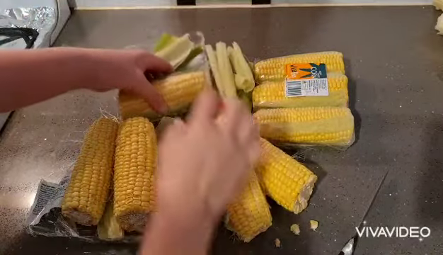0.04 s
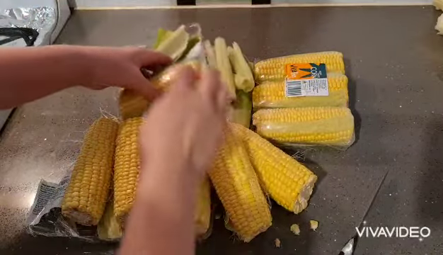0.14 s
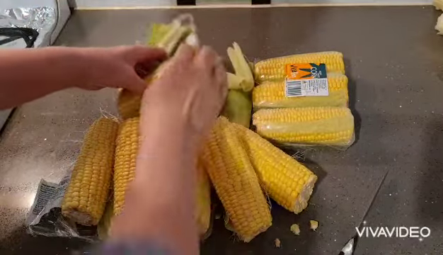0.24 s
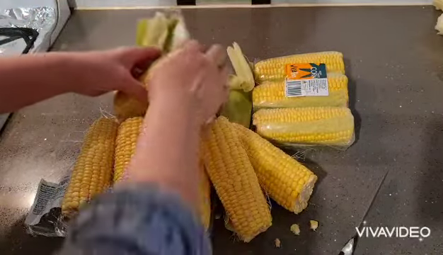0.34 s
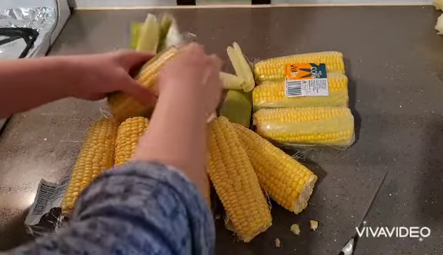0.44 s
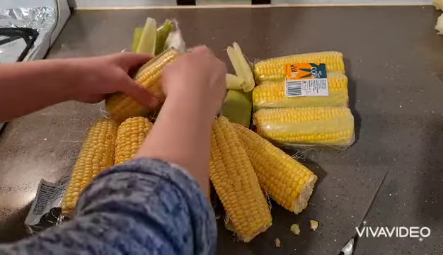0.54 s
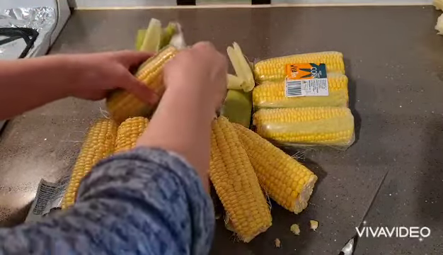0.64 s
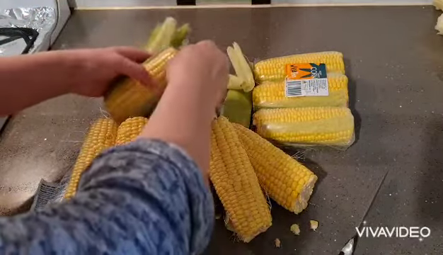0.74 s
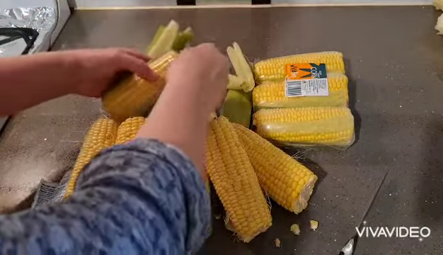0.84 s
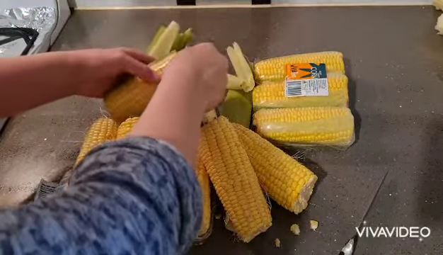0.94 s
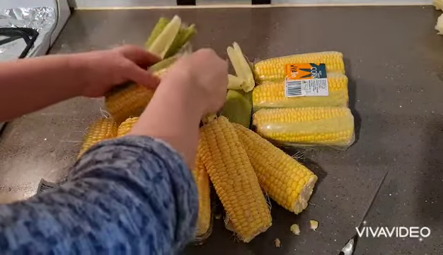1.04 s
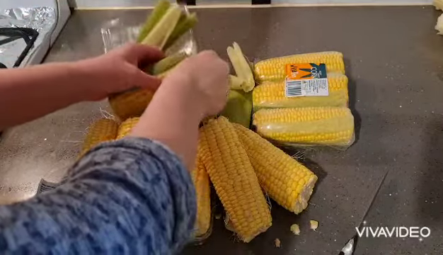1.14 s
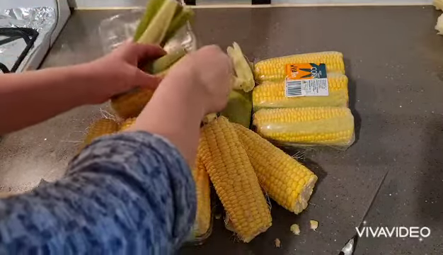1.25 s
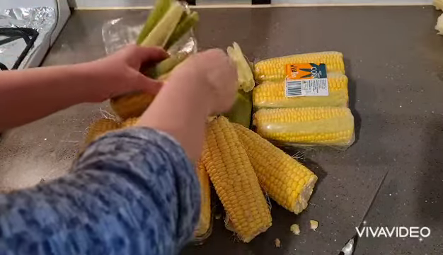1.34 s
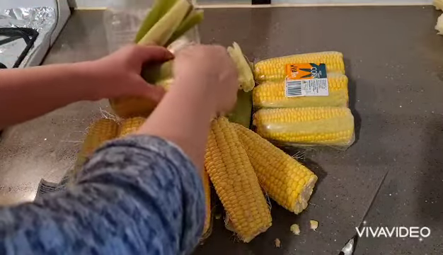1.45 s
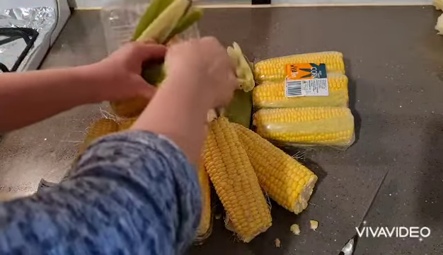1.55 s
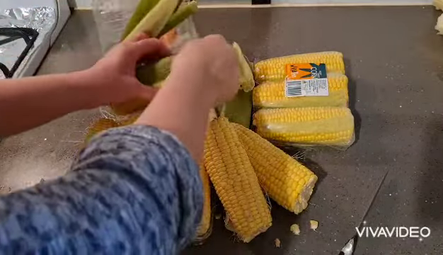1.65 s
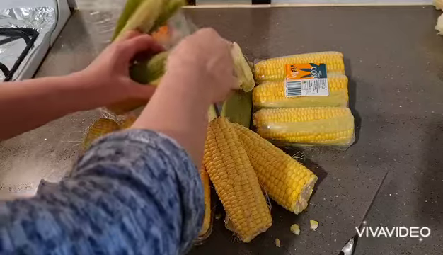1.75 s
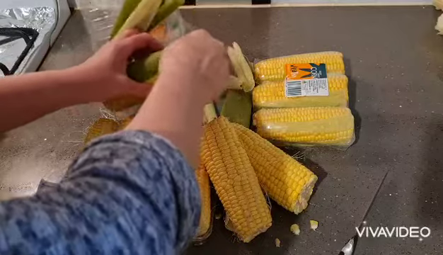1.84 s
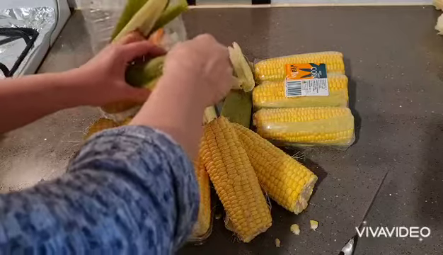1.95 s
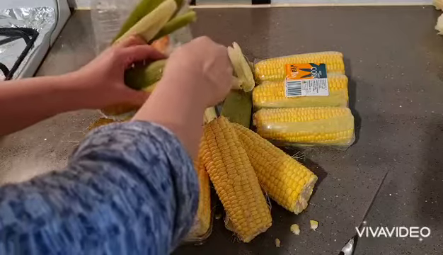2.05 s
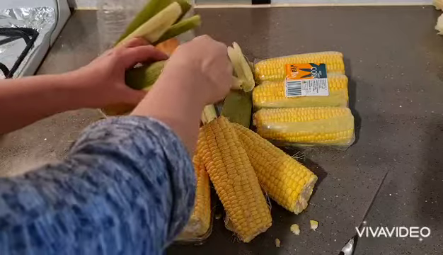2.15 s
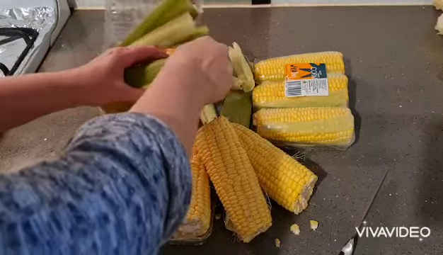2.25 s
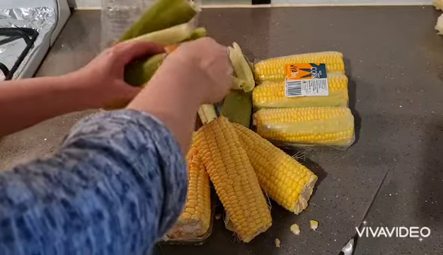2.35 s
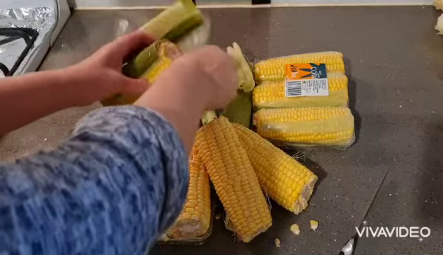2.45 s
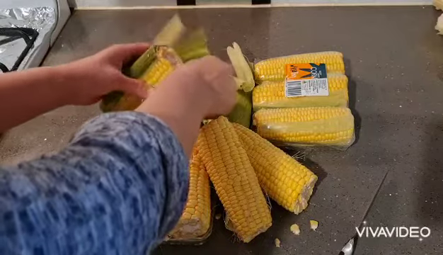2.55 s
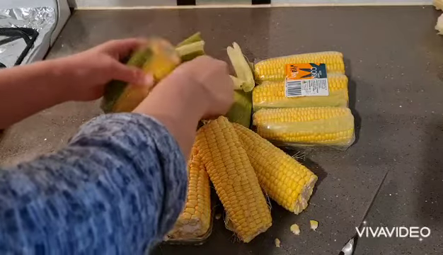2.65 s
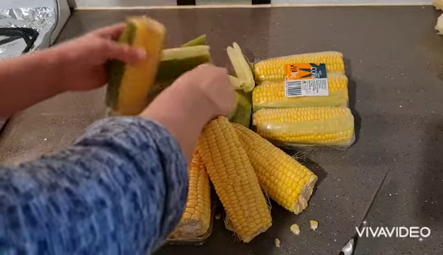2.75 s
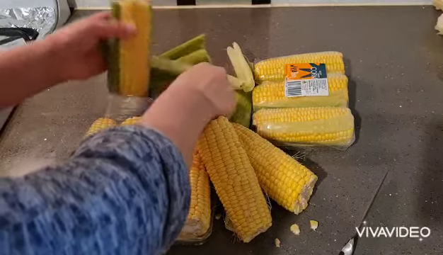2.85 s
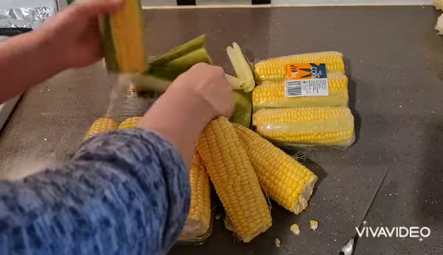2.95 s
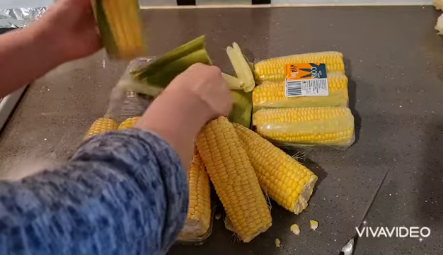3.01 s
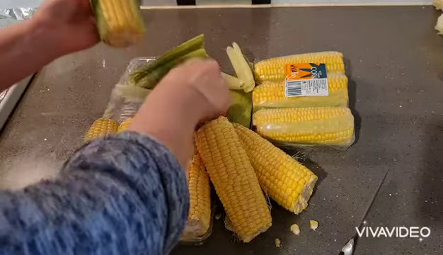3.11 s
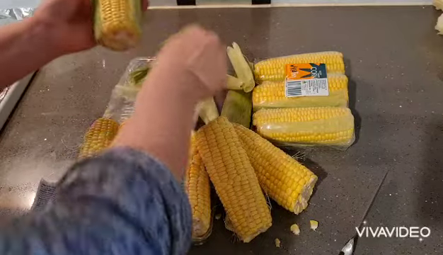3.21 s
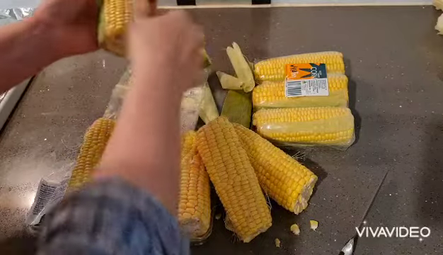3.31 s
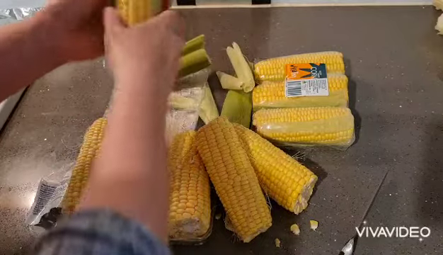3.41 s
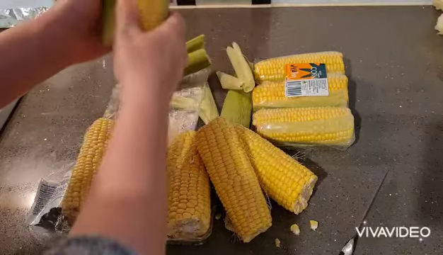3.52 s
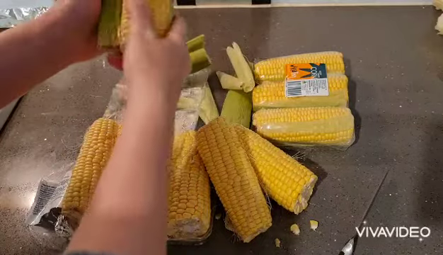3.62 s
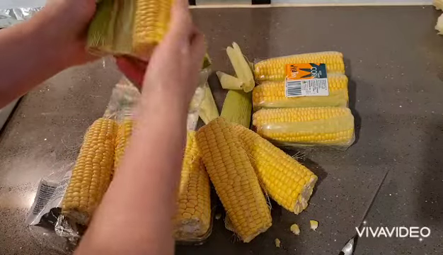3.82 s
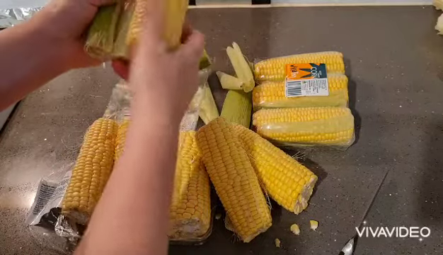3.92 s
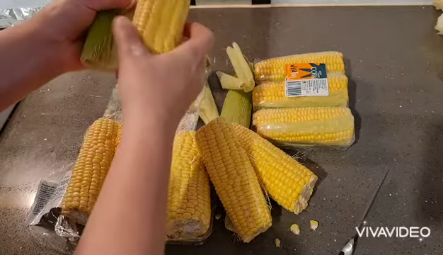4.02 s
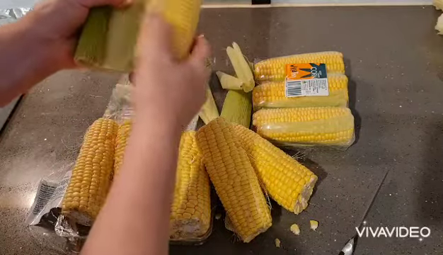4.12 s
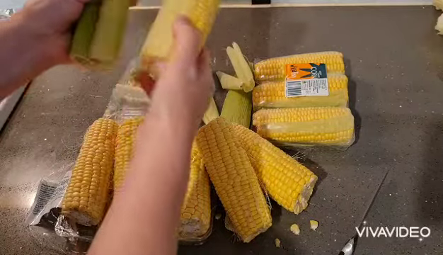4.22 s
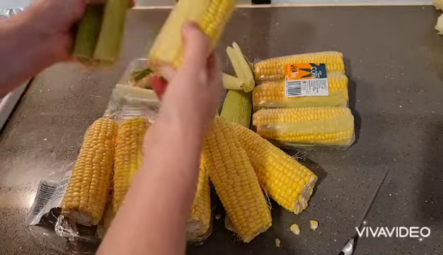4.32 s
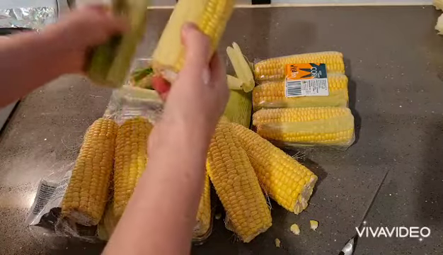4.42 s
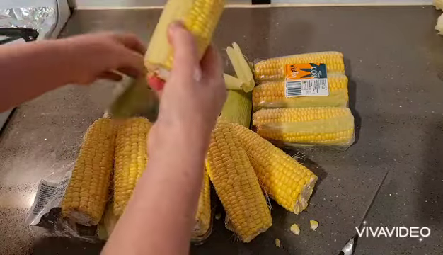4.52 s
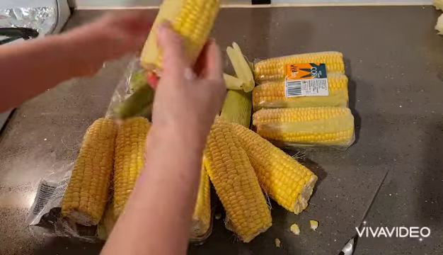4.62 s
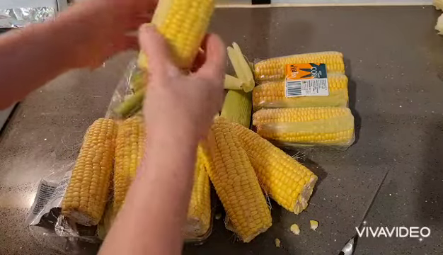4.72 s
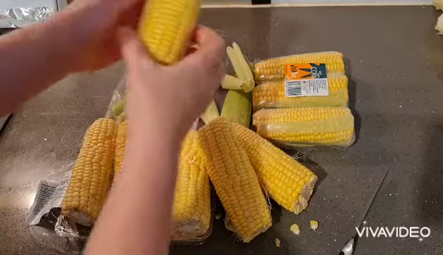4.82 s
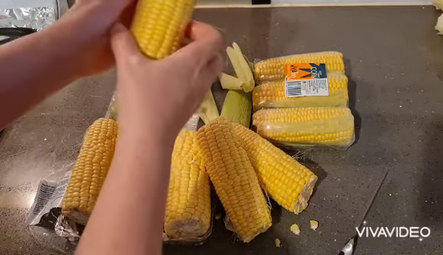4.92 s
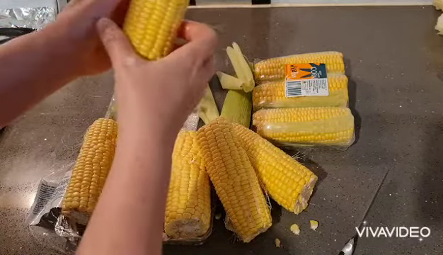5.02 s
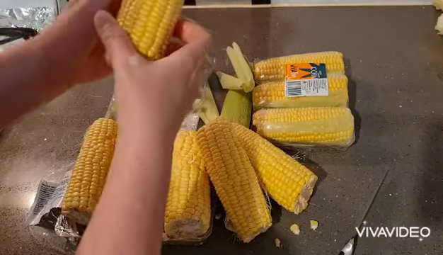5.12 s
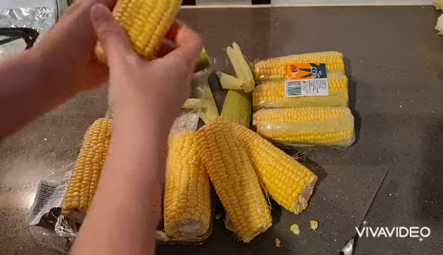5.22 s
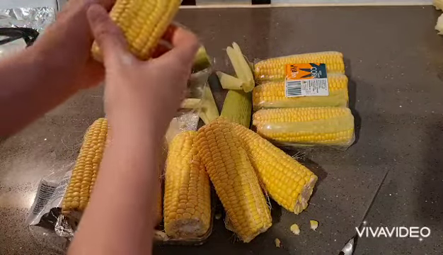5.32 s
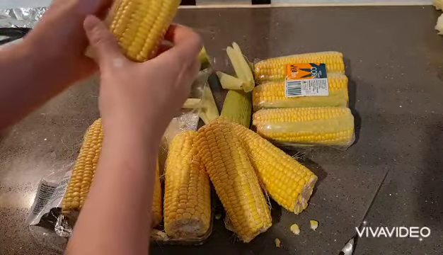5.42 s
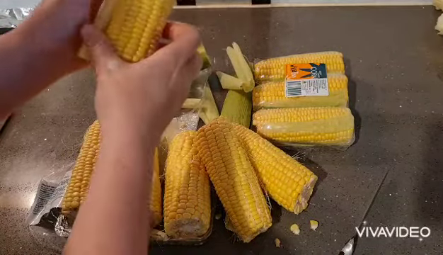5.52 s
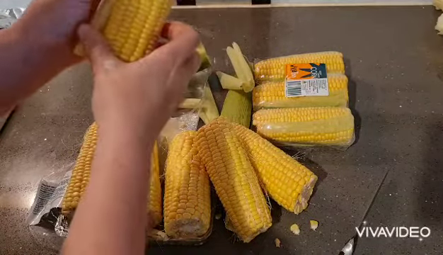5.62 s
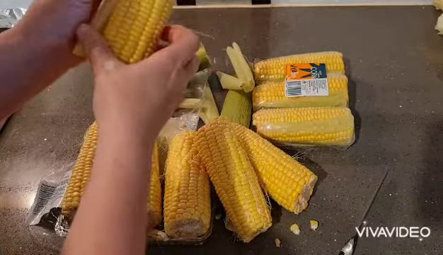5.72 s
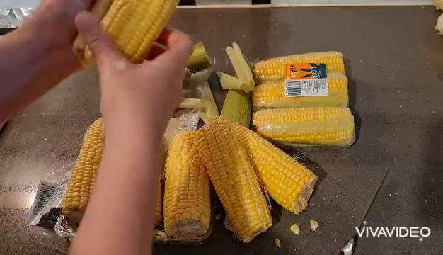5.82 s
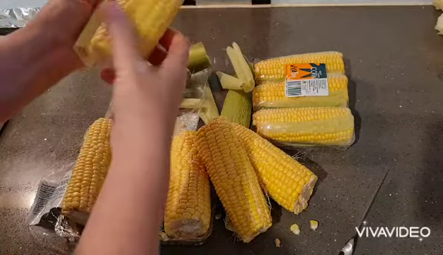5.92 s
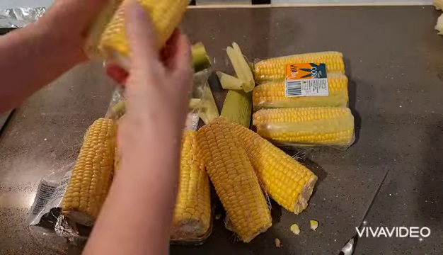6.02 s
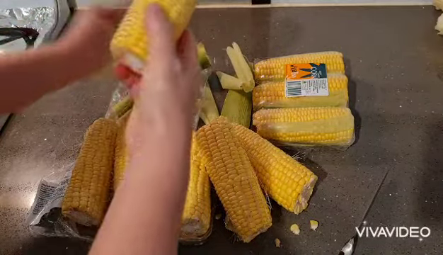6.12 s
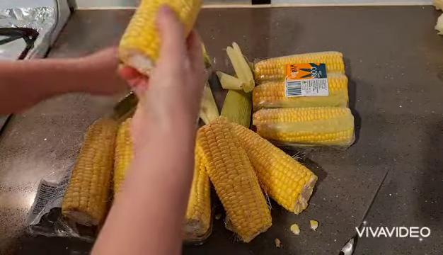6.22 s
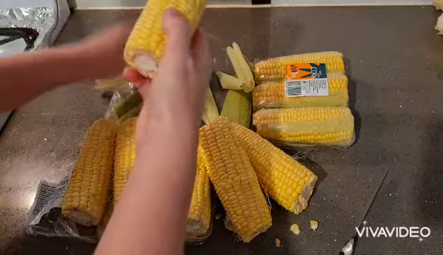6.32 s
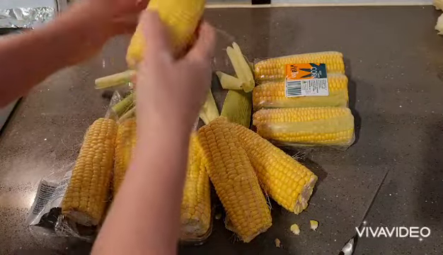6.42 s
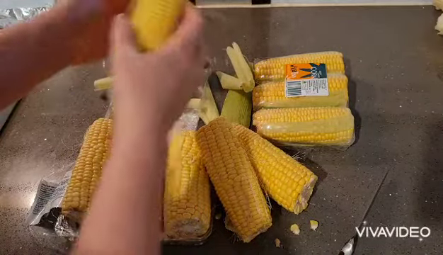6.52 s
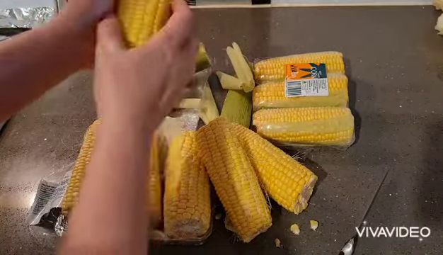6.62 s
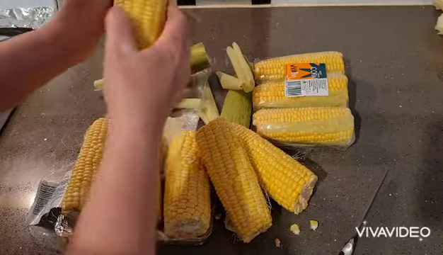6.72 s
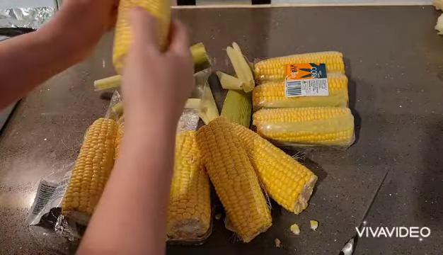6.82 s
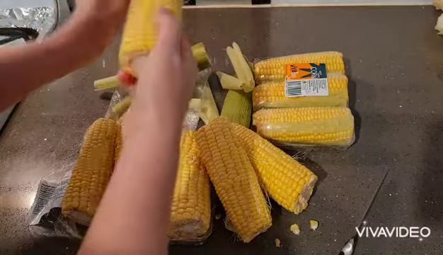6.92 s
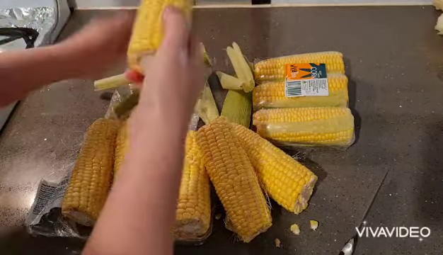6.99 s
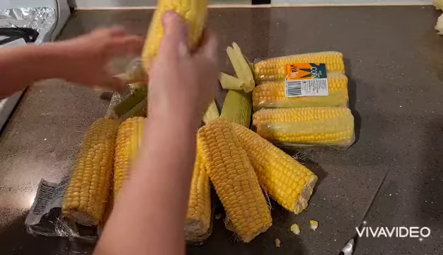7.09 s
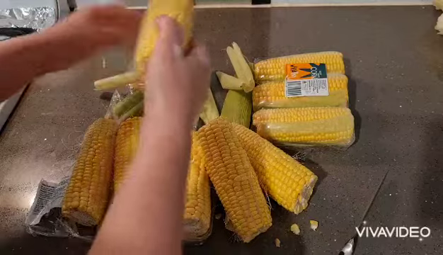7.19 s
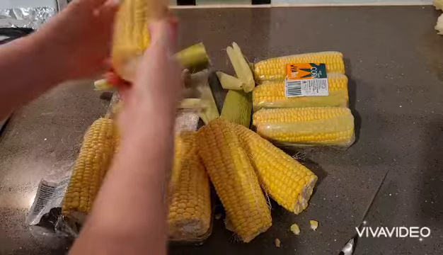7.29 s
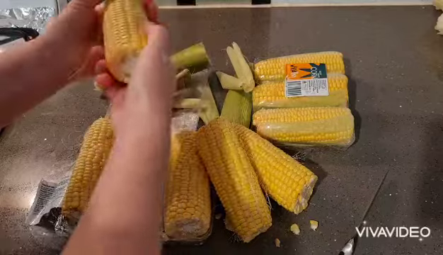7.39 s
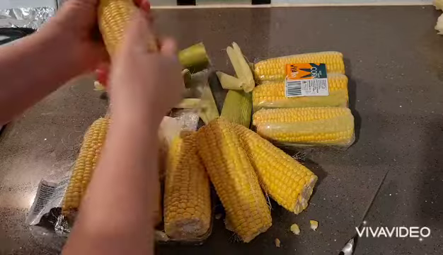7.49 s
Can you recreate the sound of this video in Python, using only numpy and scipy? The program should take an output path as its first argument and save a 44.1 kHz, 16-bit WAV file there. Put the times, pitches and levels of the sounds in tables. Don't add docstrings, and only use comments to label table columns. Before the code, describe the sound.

A small hard kitchen, heard in close stereo about half a metre from the hands. A low fan hum around 157 Hz wavers throughout, with soft rumble and faint hiss. From 0 to 1.3 s, dry husk rustles lightly, with small ticks and snaps near 0.2, 0.56, 1.1 and 1.2 s and a dull cob knock at 0.56. A crisp tick and tear come at 1.74 s, then faint rubbing. At 2.42 s the husk breaks in a very loud, bright double crack with a ripping burst; another strong, duller snap follows at 2.62, with cob knocks until 2.8. It is nearly quiet until 3.57, then light tears and ticks to 3.9. Short crackles come at 4.27 and 4.6, faint thin silky rubbing around 5.1, and a tear at 5.45. Crisp rustles and snaps cluster at 5.83 to 6.0 and at 6.27. Only slight rubbing around 7 to 7.3 s remains over the hum.

```python
import sys
import numpy as np
from scipy import signal
from scipy.fft import rfft, irfft
from scipy.io import wavfile
from scipy.ndimage import uniform_filter1d

SR = 44100
rng = np.random.default_rng(int(sys.argv[2]) if len(sys.argv) > 2 else 0)


def digitize_waveform(pressure):
    field = np.atleast_2d(pressure).T
    bounded = np.clip(field, -1, 1)
    quanta = np.round(bounded * 32767).astype(np.int16)
    wavfile.write(sys.argv[1], SR, quanta)


def to_linear_factor(level_db):
    exponent = np.asarray(level_db, float) / 20
    return 10 ** exponent


N = 332955
TIME = np.arange(N) / SR
HZ = np.fft.rfftfreq(N, 1 / SR) + 1


def unit(x):
    return x / np.sqrt(np.mean(x ** 2))


def across(table, hz):
    table_hz, value = np.transpose(table)
    return np.interp(np.log(hz), np.log(table_hz), value)


def colour(x, table):
    gain = to_linear_factor(across(table, np.fft.rfftfreq(1024, 1 / SR) + 1))
    cepstrum = irfft(np.log(unit(gain)))
    cepstrum[1:512] *= 2
    cepstrum[513:] = 0
    impulse = irfft(np.exp(rfft(cepstrum)))
    return signal.fftconvolve(x, impulse)[:len(x)]


def ring(x, hz, width_hz):
    b, a = signal.iirpeak(min(hz, 0.45 * SR), hz / width_hz, SR)
    return signal.lfilter(b, a, x)


# hz, correlation
PORT_LIKENESS = [(60, .985), (200, .98), (350, .88), (640, .45), (1400, -.3), (3000, 0), (15000, 0)]
# hz, left_minus_right_db
PORT_LEAN = [(60, 6), (110, -6.5), (200, -2.5), (380, 2), (700, 0), (1290, -2), (2380, 0.5), (4400, -6.5),
             (8120, 0.5), (15000, 1.5)]


def pair(gain):
    likeness = np.clip(across(PORT_LIKENESS, HZ), -1, 1)
    mid, side = rfft(rng.standard_normal((2, N))) * gain
    mid = mid * np.sqrt(1 + likeness)
    side = side * np.sqrt(1 - likeness)
    lead = np.exp(1j * np.pi * np.minimum(HZ, 300) * 0.00044)
    lean = to_linear_factor(across(PORT_LEAN, HZ) / 2) * lead
    return unit(irfft([(mid + side) * lean, (mid - side) / lean], N))


# time_s, level_db
FAN_HUM = [(0.0, -55), (0.06, -48.5), (0.46, -41), (0.5, -50.5), (1.72, -43.5), (1.76, -49.5),
           (2.44, -42.5), (2.67, -56), (2.69, -39), (2.75, -39.5), (2.98, -53), (3.09, -44), (4.48, -46.5),
           (4.81, -52), (6.5, -45.5), (6.54, -52), (7.47, -46), (7.55, -59)]
HUM_HZ, HUM_WIDTH_HZ = 156.9, 42.5


def fan():
    hum = pair(1 / (1 + ((HZ - HUM_HZ) / (HUM_WIDTH_HZ / 2)) ** 4))
    power = uniform_filter1d(hum.mean(axis=0) ** 2, size=SR // 12)
    steadied = hum / (power + 0.071) ** 0.04
    return steadied * to_linear_factor(np.interp(TIME, *np.transpose(FAN_HUM)))


# hz, density_db_per_hz
RUMBLE = [(25, -66), (45, -19), (80, -3.5), (105, -8), (200, -17), (250, -17), (330, -15), (420, -29),
          (650, -25), (800, -28), (1000, -26), (1500, -46.5), (2000, -40), (3000, -57)]
# hz, density_db_per_hz
PORT_HISS = [(1500, -7), (3000, -21), (4000, -15.5), (5500, -6.5), (7300, -4), (8800, -8), (11000, -1.5),
             (13700, -1.5), (15700, 0)]
RUMBLE_DB, HISS_DB = -51.5, -61.5
WHINE_HZ, WHINE_WIDTH_HZ, WHINE_DB = 13780, 200, -77


def air():
    rumble = to_linear_factor(RUMBLE_DB) * pair(to_linear_factor(across(RUMBLE, HZ)))
    hiss = to_linear_factor(HISS_DB) * pair(to_linear_factor(across(PORT_HISS, HZ)))
    whine = to_linear_factor(WHINE_DB) * pair(1 / (1 + ((HZ - WHINE_HZ) / (WHINE_WIDTH_HZ / 2)) ** 2))
    return rumble + hiss + whine


# time_s, level_db, heaviness_db, thinness_db
GRIP = [(0.0, -62, 4, 3.5), (.1, -70.5, 1.5, -0.5), (.55, -65, 5.5, 2.1), (.65, -89, 1, 3.1),
        (.95, -83, -6, -2), (1.35, -84, -5, 3), (2.0, -75, 12.5, -3), (2.9, -81, 7, 0.5), (3.2, -75, 4, 5),
        (3.52, -76, -8.5, 6), (4.1, -68, -0.5, 5), (4.45, -76, -8, 3), (4.75, -69.5, -2, 6.5),
        (5.4, -68, -8, 3), (5.7, -68.5, 0, 4), (6.1, -80.5, -12, 8), (6.45, -83.5, 1, -1),
        (7.55, -78.5, 8, -3)]
# middle_s, level_db, fall_20db_s, heaviness_db, thinness_db
RUBS = [(0.22, -66, 0, 9.5, 1.1), (0.54, -64.5, -0.03, 2, 4), (.83, -65.5, .08, 0.5, 0.5),
        (1.05, -70.5, 0.24, -10, 0.1), (1.495, -67.5, 0.16, 6.5, -7), (1.69, -63.5, .1, 5.5, 5),
        (2.23, -72.5, 1.1, -7, 6), (2.333, -63.5, 0.1055, 9, -11), (2.502, -48, 0.09, 5, 0),
        (2.67, -56, 0.16, 3.5, -9), (2.82, -61, 0.14, 2.5, 4.5), (3.68, -67, 0.34, -3, -3),
        (4.266, -52, 0.1045, -4.5, 1), (4.633, -54, 0.06, 3.5, -2), (4.69, -64, 0.2, -7, 5.5),
        (5.045, -69.5, 0.2, -23, 6), (5.15, -65, -0.6, -14, 6), (5.21, -62, 0.2, -21, 7),
        (5.844, -42, 0.02, -3.5, 3.33), (5.96, -51, 0.09, -9.5, -3), (6.186, -61.5, 0.12, -5.5, 3),
        (7.015, -69, 0.23, -12, -2), (7.12, -64, -0.9, -3, -6), (7.336, -66, 0.04, 0, -6)]
# start_s, level_db, fall_20db_s, heaviness_db, thinness_db
RIPS = [(0.411, -60.5, 0.36, -3, -2.1), (0.56, -65, 0.07, 14.5, -6), (0.734, -67, 0.3, 4, -4),
        (1.08, -64, 0.44, -3, 2.1), (1.096, -56, 0.19, -1.5, 3.5), (1.208, -53.5, 0.03, -2, 6.5),
        (1.23, -65, .1, 3, 0), (1.742, -61, 0.3, -3, 3), (2.142, -63.5, 0.36, 3, 1),
        (2.421, -28.5, 0.103, -19, -2), (2.618, -40, 0.0646, -24, -21), (2.717, -55, 0.0931, 8, 7.5),
        (2.785, -50.5, 0.0227, 4, 9), (3.572, -59, 0.15, 3.5, 3), (3.777, -58.5, 0.2, -5, 2.1),
        (3.863, -61.5, .16, 4.5, 1), (5.452, -52, 0.14, -6, 2), (5.829, -46.5, 0, -1, 2),
        (5.945, -51.5, 0.1, -10, -2), (6.266, -49.5, 0.0549, -3, -2), (6.275, -53.5, 0.17, -1.5, 0)]
BROAD_DB, BROAD_PER_HEAVY, GRIP_BROAD_DB = 2.43, 0.59, -3.5
RIP_ATTACK_S = 0.0012
RUB_SWELL = 0.82
RUB_ROUND = 1.35


def husk_parts(db, heavy_db, thin_db):
    flat = 0 * db
    broad_db = BROAD_DB + BROAD_PER_HEAVY * heavy_db + flat
    return to_linear_factor(2 * (db + np.array([flat, broad_db, thin_db + flat, heavy_db + flat])))


def husk():
    time_s, *columns = np.transpose(GRIP)
    power = husk_parts(*(np.interp(TIME, time_s, c) for c in columns))
    power[1] *= to_linear_factor(2 * GRIP_BROAD_DB)
    strokes = [(RIP_ATTACK_S, 1, *r) for r in RIPS]
    strokes += [(RUB_SWELL * r[2], RUB_ROUND, *r) for r in RUBS]
    for swell_s, curve, peak_s, db, fall_s, heavy_db, thin_db in strokes:
        first = max(int((peak_s - 2 * swell_s) * SR), 0)
        span = slice(first, int((peak_s + 2 * fall_s) * SR))
        t = TIME[span] - peak_s
        drop_db = 20 * np.maximum(t / fall_s, -t / swell_s) ** curve
        power[:, span] += husk_parts(db - drop_db, heavy_db, thin_db)
    return power


def crackle(count, per_s, spread_db):
    chance = rng.random((count, 3))
    size_db = np.minimum(-spread_db * np.log(1 - chance[:, 0]), 13)
    size = to_linear_factor(size_db) * np.sign(chance[:, 1] - 0.5)
    return size * (chance[:, 2] < per_s / SR)


# hz, gain_db
LEAF = [(1500, -36.5), (3000, -22), (4200, 5), (5500, -4.5), (7500, -3), (9500, -12.5)]
# hz, gain_db
BROAD = [(700, -10.5), (1500, -1), (2300, -1.5), (3600, -5.5), (5000, -14)]
# hz, gain_db
CRISP = [(7000, -41), (9500, 0), (11000, 10), (14000, 5), (16000, 1.7)]
# hz, gain_db
COB = [(150, -19), (300, 1), (500, -2.5), (900, -5), (1400, -6), (2500, -28)]


def rustle():
    steps = np.repeat(rng.standard_normal(N // 300 + 1), 300)
    clusters_db = 2.0 * unit(uniform_filter1d(steps, size=200)[:N])
    gains = np.sqrt(husk()) * to_linear_factor(clusters_db)
    shared = crackle(count=N, per_s=3400, spread_db=0.0)
    ports = []
    for _ in range(2):
        slips = shared + 1.97 * crackle(count=N, per_s=4000, spread_db=1.5)
        parts = [unit(colour(slips, table)) for table in (LEAF, BROAD, CRISP, COB)]
        ports.append(sum(gain * part for gain, part in zip(gains, parts)))
    return np.array(ports)


# hz, t60_s
ROOM_T60 = [(300, 0.4), (2000, 0.34), (6000, 0.111), (15000, 0.061)]
PORT_LAG_MS = -0.17


def room(x, wet_db):
    t, tail = TIME[:SR // 2], 0
    for hz in 180 * 2.0 ** np.arange(7):
        octave = signal.butter(2, [hz / 2 ** 0.5, hz * 2 ** 0.5], "band", fs=SR, output="sos")
        noise = signal.sosfilt(octave, rng.standard_normal((2, len(t))))
        tail = tail + noise * 1000 ** (-t / across(ROOM_T60, hz))
    tail *= (1 - np.exp(-t / 0.0039)) * (1 + 1.04 * np.exp(-t / 0.025))
    tail *= to_linear_factor(wet_db) / np.sqrt(np.sum(tail ** 2) / 2)
    left = irfft(rfft(x[0]) * np.exp(-2j * np.pi * HZ * PORT_LAG_MS / 1000), N)
    wet = signal.fftconvolve(x.mean(axis=0)[None], tail, axes=1)[:, :N]
    return np.array([left, x[1]]) + wet


# start_s, peak_db, ring_hz
TICKS = [(0.1187, -45.5, 1970), (0.2593, -43.5, 7800), (0.414, -45.5, 5600), (0.48, -45, 7300),
         (0.7254, -45, 1690), (.822, -53, 2320), (1.124, -45, 2350), (1.4906, -47, 1580),
         (1.5617, -55, 8140), (1.654, -52, 7760), (1.741, -31.5, 8100), (2.147, -45, 7660),
         (2.2175, -45, 1070), (3.776, -40.5, 3100), (3.834, -41, 1930), (3.868, -35, 2260),
         (4.8, -47, 2400), (5.044, -50, 11000), (5.1876, -59, 11500), (5.203, -47.5, 11800),
         (5.505, -40, 3070), (5.67, -47, 8000), (5.8256, -41, 3750)]
# start_s, peak_db, ring_hz, crispness_db, left_minus_right_db
SNAPS = [(0.2078, -39.5, 1530, -7, 1), (0.56, -40, 1680, -16, 6), (0.7366, -44, 1600, -3, 0.0),
         (1.0938, -31, 2300, -5, -1), (1.2084, -29.5, 2420, -3, -2), (1.6685, -41, 1860, -7, -4),
         (1.7383, -30, 1770, 3.5, -1), (2.3233, -36, 1740, -19, -9), (2.4167, -12, 6400, 0, -1.1),
         (2.4187, -8.5, 6860, -8, -4.5), (2.617, -15, 2630, -25, -6), (2.6717, -38, 2600, -16, -2),
         (2.7155, -30.5, 1630, -3, 6), (2.784, -41, 1660, -9, -8), (3.5688, -38, 1330, 0, 3),
         (3.6722, -35.5, 1610, -3, 1), (3.8606, -34.5, 1830, -8, 6), (4.6106, -36.5, 2200, -10, 3),
         (4.629, -31.5, 1880, 2.7, 4), (5.449, -39.5, 8000, -1, 2), (5.8427, -31.5, 2700, -4, 8),
         (5.944, -28.5, 3450, -12, 13), (5.971, -36.5, 3300, 8, 6), (6.2635, -33.5, 1700, 0.5, 3)]
# hz, gain_db
CRACK = [(300, -50), (1200, -4), (2500, -2), (5000, 1), (7500, -3), (9500, -11.5)]
TICK_CRISP_DB, TICK_PAN_DB, TICK_RING_DB = 0, -0.5, -1
LEAF_RING_DB, TEAR_S = -4, 0.002
SNAP_WET_DB, RING_WET_DB = -3, -5


def snaps():
    cracks, rings = np.zeros((2, 2, N + 4096))
    t = TIME[:4096]
    breaks = [(*r, LEAF_RING_DB) for r in SNAPS]
    breaks += [(*r, TICK_CRISP_DB, TICK_PAN_DB, TICK_RING_DB) for r in TICKS]
    for start_s, db, hz, crisp_db, pan_db, ring_db in breaks:
        i = int(start_s * SR)
        span = slice(i, i + len(t))
        for port, side in enumerate((0.5, -0.5)):
            slips = crackle(count=len(t), per_s=11000, spread_db=1.0) * np.exp(-t / TEAR_S)
            slips[0] = 1.53
            body = colour(slips, CRACK)
            crisp = colour(slips, CRISP)
            tone = ring(body, hz, hz / 8)
            gain = to_linear_factor(db + side * np.clip(pan_db, -6, 6))
            cracks[port, span] += gain * to_linear_factor(-2.5) * body / abs(body).max()
            cracks[port, span] += gain * to_linear_factor(crisp_db) * crisp / abs(crisp).max()
            rings[port, span] += gain * to_linear_factor(ring_db) * tone / abs(tone).max()
    return room(cracks[:, :N], SNAP_WET_DB) + room(rings[:, :N], RING_WET_DB)


# start_s, peak_db, ring_hz, t60_s
KNOCKS = [(0.207, -39, 477, 0.087), (0.259, -41, 340, 0.036), (0.5605, -28.5, 990, 0.025),
          (0.564, -30.5, 434, 0.13), (0.723, -38, 490, 0.13), (0.796, -43.5, 417, 0.05),
          (1.47, -46, 293, 0.16), (1.74, -35, 407, 0.027), (2.22, -37, 895, 0.071),
          (2.323, -33.5, 890, 0.04), (2.329, -30, 430, 0.085), (2.361, -35, 497, 0.083),
          (2.415, -54, 386, 0.067), (2.45, -31.5, 365, 0.058), (2.491, -32, 910, 0.06),
          (2.616, -29.5, 1240, 0.066), (2.672, -30.5, 950, 0.04), (2.714, -24, 910, 0.026),
          (2.72, -30, 278, 0.084), (3.774, -38.5, 325, 0.024), (5.828, -36, 307, 0.048),
          (6.262, -39, 500, 0.07)]


def knocks():
    out, t = np.zeros(N + 8192), TIME[:8192]
    for start_s, db, hz, t60_s in KNOCKS:
        blow = rng.standard_normal(len(t)) * 1000 ** (-t / max(t60_s, 0.01))
        blow[0] = 8
        thud = colour(blow, COB)
        thud = thud + to_linear_factor(5.5) * ring(thud, hz, hz / 6)
        i = int(start_s * SR)
        out[i:i + len(t)] += to_linear_factor(db) * thud / abs(thud).max()
    return np.array([out[:N], out[:N]])


def scene():
    leaves = room(to_linear_factor(0.5) * rustle(), wet_db=-8.5)
    cobs = room(knocks(), wet_db=-10)
    return fan() + air() + leaves + snaps() + cobs


def band_limit(x):
    return signal.sosfilt(signal.butter(12, 16810, fs=SR, output="sos"), x)


def record(dry):
    low_pass = signal.ellip(10, 0.2, 60, 15750, fs=SR, output="sos")
    mix = signal.sosfilt(low_pass, dry)
    return band_limit(mix)


dry = scene()
out = record(dry)
digitize_waveform(out)
```